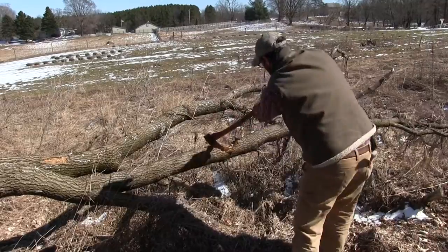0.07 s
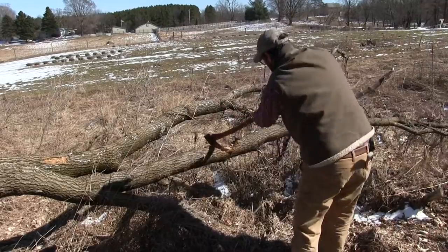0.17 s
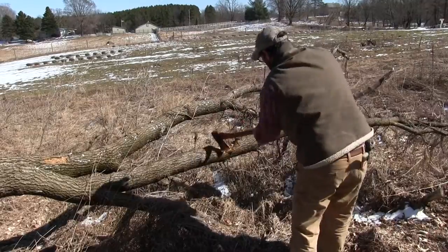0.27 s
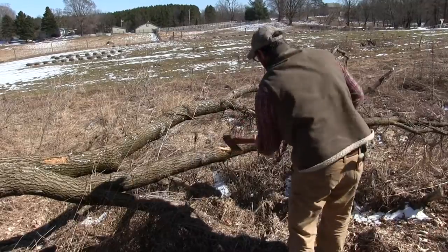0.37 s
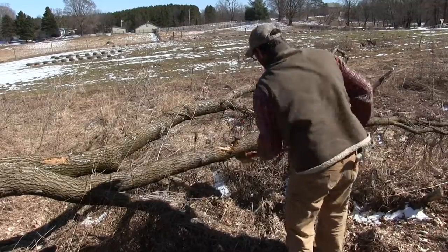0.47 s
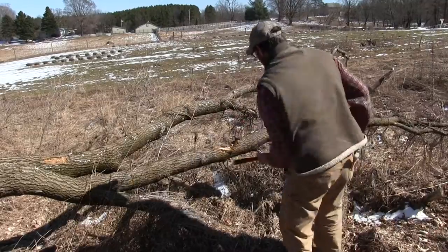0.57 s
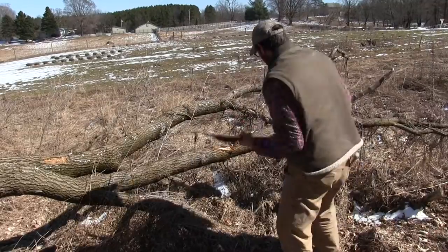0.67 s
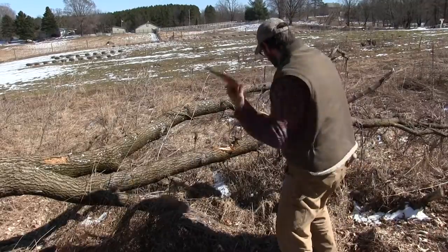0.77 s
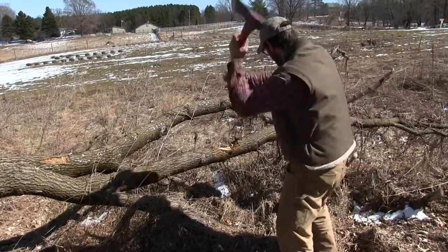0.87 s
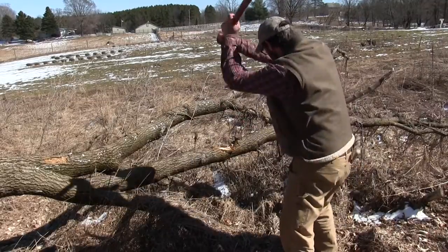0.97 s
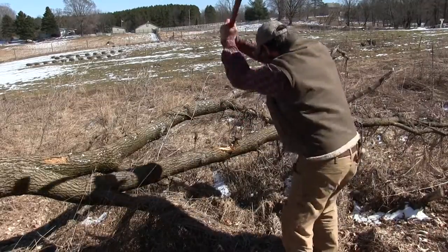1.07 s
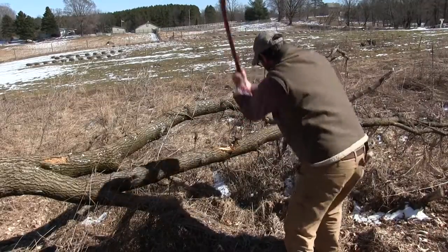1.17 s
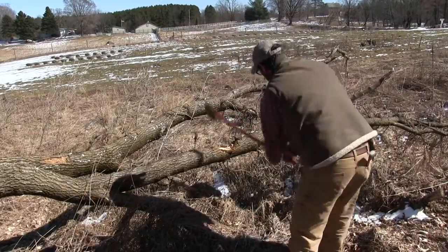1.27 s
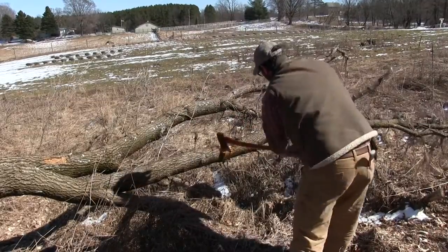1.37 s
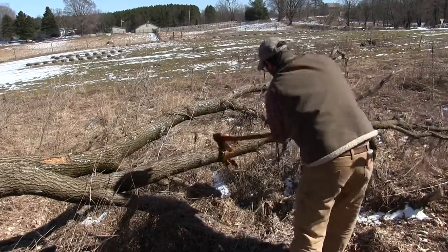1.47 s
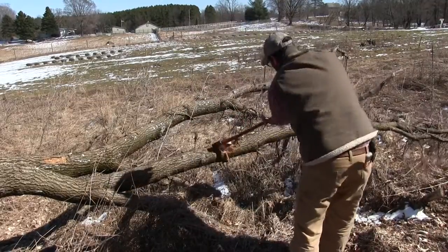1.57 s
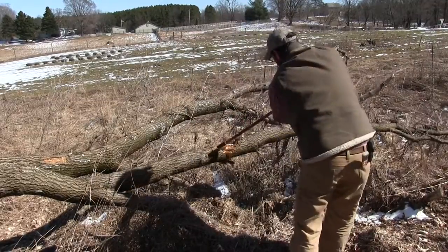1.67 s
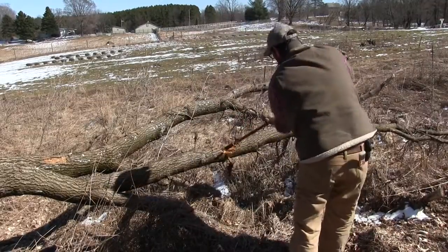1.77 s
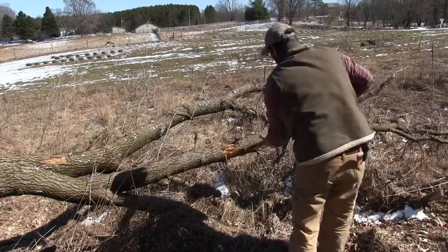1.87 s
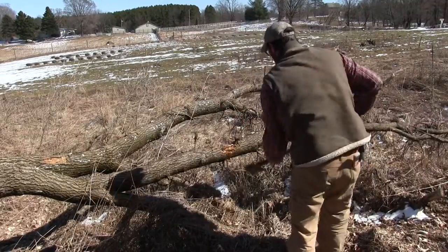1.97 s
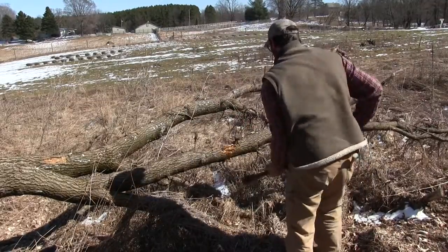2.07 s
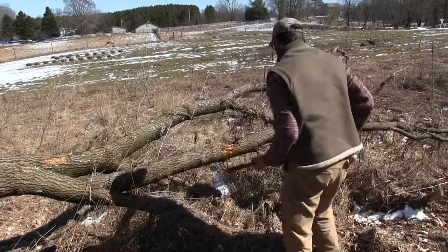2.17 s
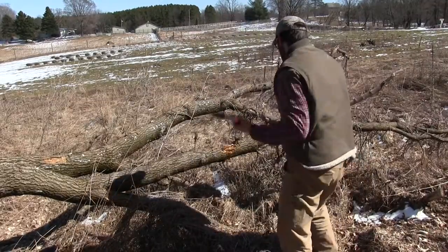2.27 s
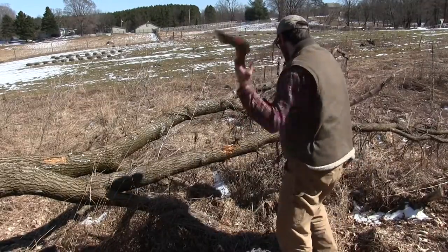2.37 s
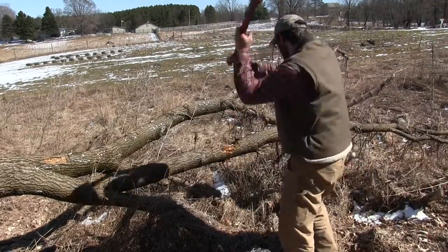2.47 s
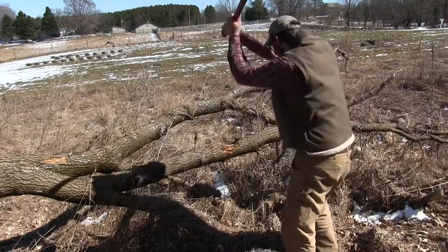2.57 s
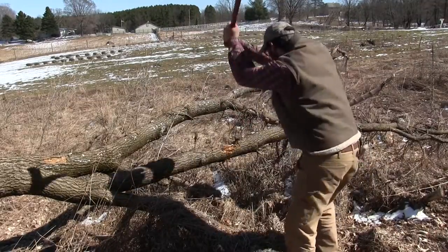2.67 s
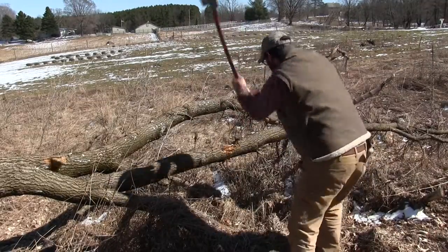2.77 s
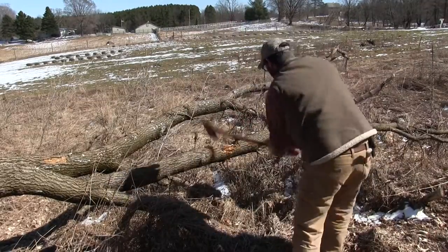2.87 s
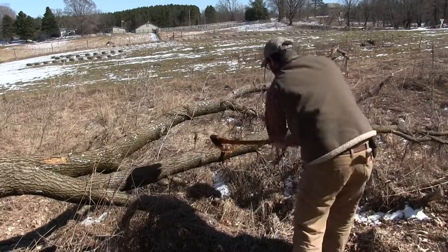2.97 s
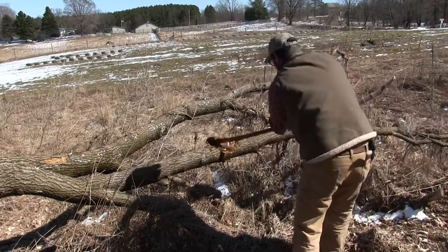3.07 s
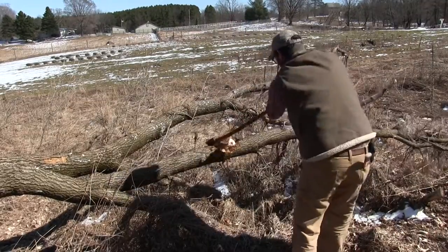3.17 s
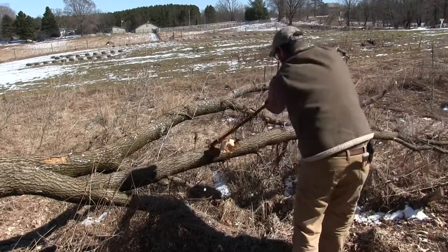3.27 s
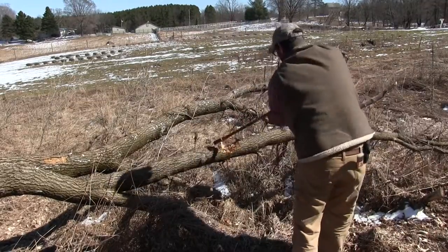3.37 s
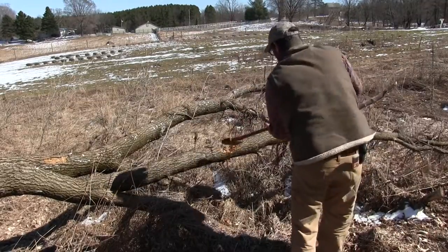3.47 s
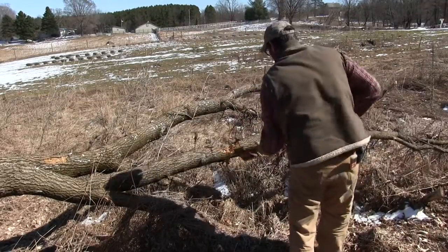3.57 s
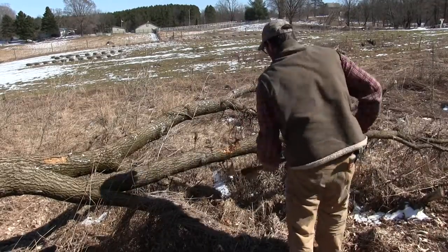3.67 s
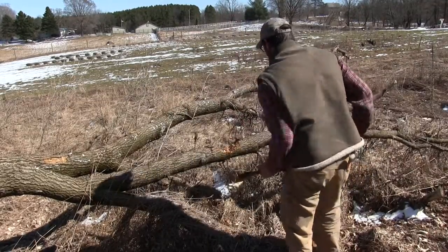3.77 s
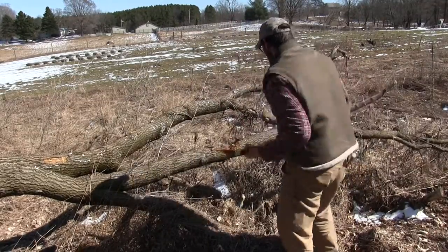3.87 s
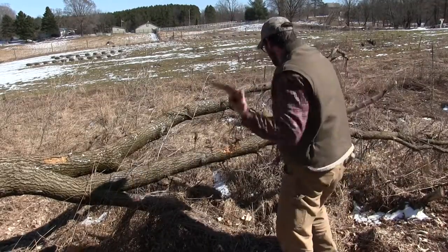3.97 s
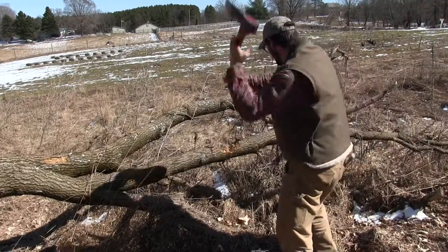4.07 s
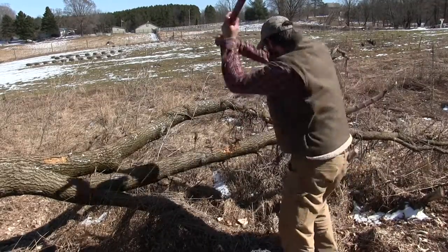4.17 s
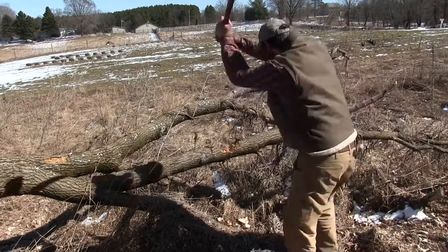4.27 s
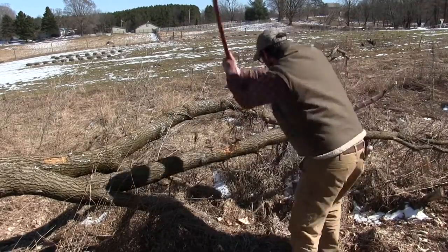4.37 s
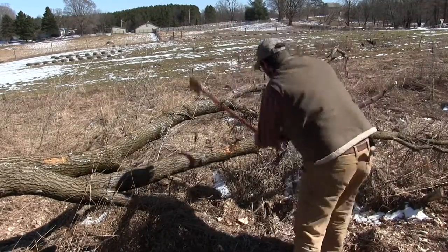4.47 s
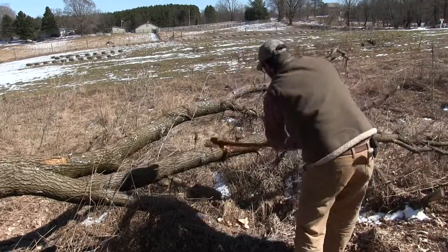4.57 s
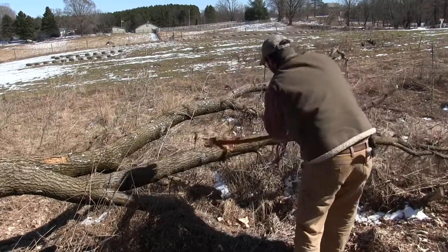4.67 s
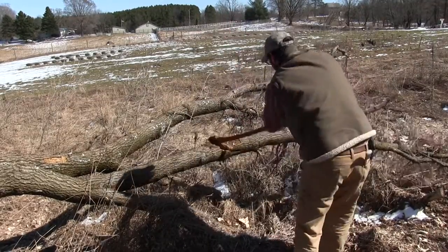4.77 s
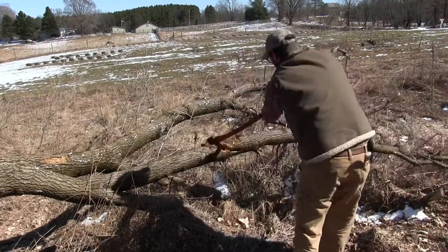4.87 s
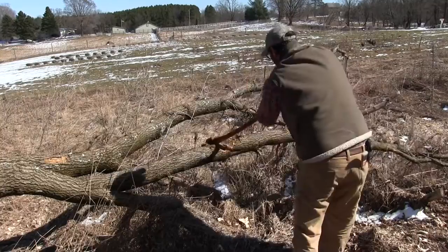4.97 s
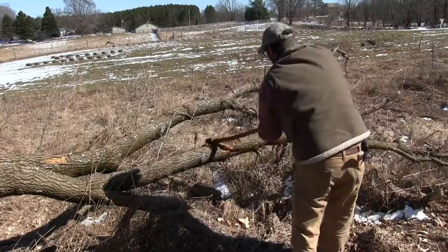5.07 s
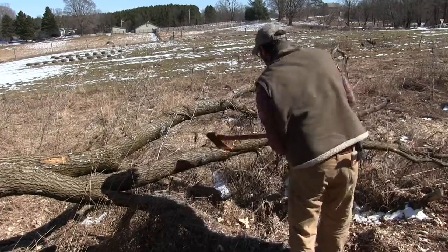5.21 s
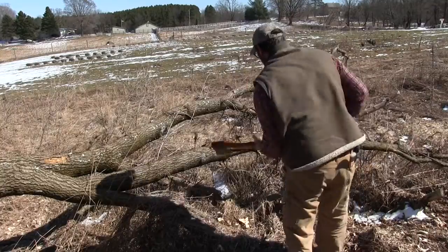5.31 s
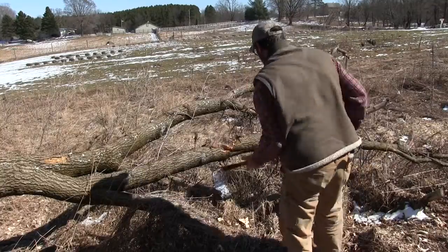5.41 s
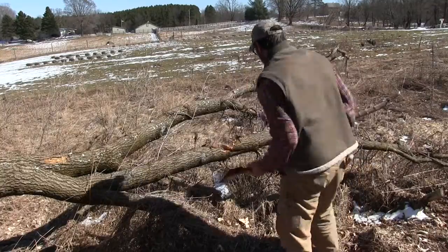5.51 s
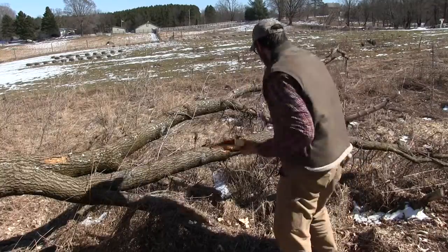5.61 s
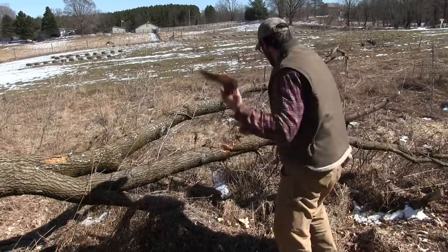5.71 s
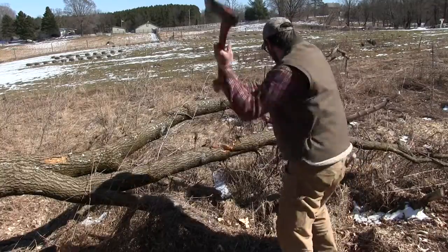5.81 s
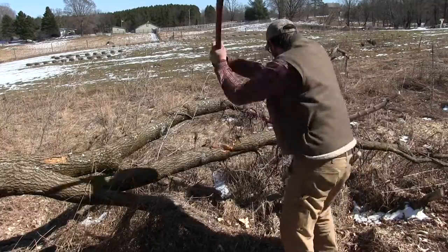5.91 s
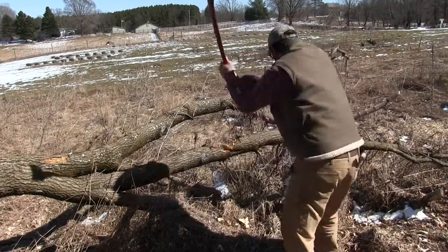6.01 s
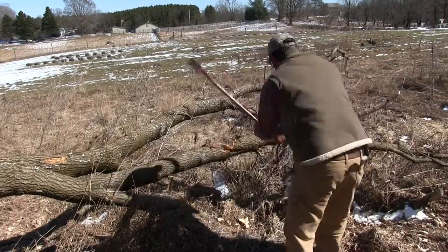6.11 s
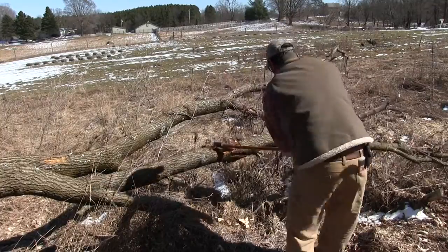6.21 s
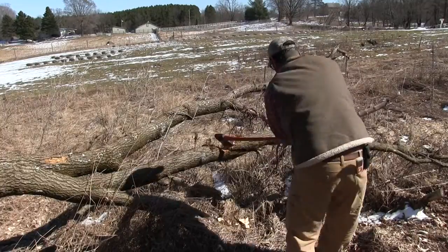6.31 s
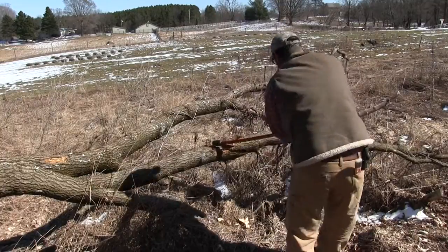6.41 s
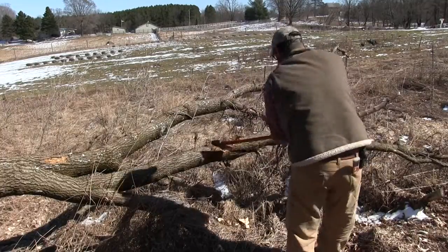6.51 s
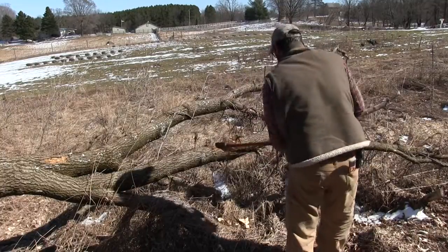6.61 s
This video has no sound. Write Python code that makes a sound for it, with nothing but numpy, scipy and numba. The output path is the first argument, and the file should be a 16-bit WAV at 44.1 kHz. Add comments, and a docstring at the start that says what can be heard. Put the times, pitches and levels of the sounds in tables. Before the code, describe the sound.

Spaced axe blows crack and thud into a fallen limb, chips pattering and dry brush rustling, with wind buffeting in an open field.

```python
"""An axe chops into a fallen limb in an open field: each blow is a ragged burst of force that rings the wood.
Chips are puffs of noise through one resonance; shaken twigs and dry grass are clumps of tiny noise grains.
Wind is lumpy low noise on two microphone ports, with single thumps. A palm squeaks by stick and slip on
the handle, a sleeve swishes as soft treble noise, and a far bird whistles in bent tones with an echo.
A limiter turns loud moments down, and the fastest peaks are clipped softly."""
import sys
import numpy as np
from scipy import signal
from scipy.fft import rfft, irfft, next_fast_len
from scipy.io import wavfile
from scipy.ndimage import map_coordinates
from numba import njit

SR = 44100
rng = np.random.default_rng(int(sys.argv[2]) if len(sys.argv) > 2 else 0)


def int16_out(signal):
    """Quantize to a 16-bit WAV file."""
    q = np.round(np.clip(np.atleast_2d(signal).T, -1, 1) * 32767)
    wavfile.write(sys.argv[1], SR, q.astype(np.int16))


N = 293265
T = np.arange(N) / SR  # time of every sample [s]

# How alike left and right are at each pitch: (frequency [Hz], likeness [0 to 1])
LIKENESS = [(60, 0.62), (180, 0.67), (550, 0.74), (1650, 0.61), (4970, 0.47), (15000, 0.91)]
# A blow, a tug at the stuck blade or a step shakes the brush:
# (time [s], rise [s], hold [s], time for the thrash to fall 60 dB [s], twigs [dB], dry grass [dB])
BRUSH_SHAKES = [(-0.15, 0.047, .01, 1.1, -28.5, -28), (1.419, .12, 0.015, 1.25, -28.5, -29.5),
                (1.963, 0.12, 0.0091, 0.31, -63, -39.5), (2.28, .08, 0.026, 0.88, -54, -45),
                (3, 0.07, 0.17, 0.87, -31.5, -31), (3.867, 0.26, .02, .7, -54, -44.5),
                (4.626, .11, 0.11, .1, -33, -33), (4.85, 0.046, 0.069, 0.35, -34, -31.5),
                (6.286, 0.1, 0.12, 0.54, -38.5, -34.5)]


def amp(db):
    """Turns decibels into a plain gain."""
    return 10 ** (np.asarray(db) / 20)


def unit(x):
    """Scales a sound to an rms (average strength) of 1."""
    return x / np.sqrt(np.mean(x ** 2) + 1e-20)


def along(points, hz):
    """Reads a curve of (Hz, value) points on a logarithmic frequency axis."""
    f, v = np.transpose(points)
    return np.interp(np.log(hz + 1), np.log(f + 1), v)


def wobble(rate):
    """A smooth random curve with `rate` random points a second."""
    points = rng.standard_normal(int(N * rate / SR) + 4)
    return map_coordinates(points, [T * rate])


def filtered(x, response):
    """Filters x by a response given as a function of frequency."""
    m = next_fast_len(N + SR // 2)
    hz = np.fft.rfftfreq(m, 1 / SR)
    return irfft(rfft(x, m) * response(hz), m)[..., :N]


def dull(x, hz):
    """A gentle low-pass filter that takes away the treble."""
    return signal.lfilter(*signal.butter(2, np.clip(hz, 100, 18000), fs=SR), x)


def sides(pan_db):
    """Left and right gains; a positive value makes the left louder."""
    return amp(np.array([pan_db / 2, -pan_db / 2]))


def add(track, s, sound):
    """Mixes a stereo sound into the track at s seconds."""
    part = track[:, round(s * SR):][:, :sound.shape[1]]
    part += sound[:, :part.shape[1]]


def spread(pair, spectrum, alike):
    """Colours two unrelated signals and mixes them to the wanted left-right likeness, rms 1."""
    def response(hz):
        turn = np.arccos(np.clip(along(alike, hz), -1, 1)) / 2
        return amp(along(spectrum, hz)) * np.array([np.cos(turn), np.sin(turn)])
    mid, side = filtered(pair, response)
    return unit(np.array([mid + side, mid - side]))


def crackle(rate, spiky_db, hiss, life):
    """Uneven noise grains with a sharp start and a short decay (life [s]), on a bed of hiss."""
    happens = rng.random((2, N)) < rate / SR
    starts = happens * amp(spiky_db * rng.random((2, N)))
    envelope = signal.lfilter([1], [1, -np.exp(-1 / (life * SR))], starts)
    grains = envelope * rng.standard_normal((2, N))
    return unit(grains) + hiss * rng.standard_normal((2, N))


def shake(peaks_db, linger_db, linger_t60, rest_db):
    """Brush level in dB: each shake swells, thrashes, then rustles on while it dies away."""
    power = amp(2 * rest_db) * np.ones(N)
    for (s, rise, hold, thrash_t60, *_), db in zip(BRUSH_SHAKES, peaks_db):
        after = np.maximum(T - s - rise - hold, 0)
        swell = np.clip((T - s) / rise, 0, 1) ** 0.84
        thrash = amp(-120 * after / thrash_t60)  # -120 because this is power
        rustle = amp(2 * linger_db - 120 * after / linger_t60)
        power += (amp(db) * swell) ** 2 * (thrash + rustle)
    return 10 * np.log10(power)


def shaking():
    """Levels of twigs and grass in dB: both follow the same shakes, but rustle on differently."""
    *_, twigs_db, grass_db = np.transpose(BRUSH_SHAKES)
    twigs = shake(twigs_db, linger_db=-12, linger_t60=4.53, rest_db=-52)
    grass = shake(grass_db, linger_db=-8.5, linger_t60=3.5, rest_db=-53)
    return twigs, grass


def brush():
    """Twigs rattle in coarse grains, dry grass in fine ones with sparse sharp ticks; both come in clumps."""
    # Tone colour of the twigs: (frequency [Hz], level [dB per Hz])
    twig_spectrum = [(80, -48), (150, -12.5), (300, -4.5), (600, -3.5), (1200, -3), (2500, -13.5),
                     (5000, -16), (9000, -34)]
    # Tone colour of the dry grass: (frequency [Hz], level [dB per Hz])
    grass_spectrum = [(800, -12), (2000, -0.5), (3500, -4), (6000, -3.5), (9000, -3), (12000, -5.5),
                      (15000, -5.5), (16500, -26.5)]
    twigs_db, grass_db = shaking()
    clumps = wobble(55)
    coarse = crackle(150, 14.3, hiss=1.0, life=0.0046)
    twigs = amp(twigs_db + 0.16 * clumps) * spread(coarse, twig_spectrum, LIKENESS)
    ticks = crackle(25, 3.1, hiss=0.01, life=0.0014)
    fine = crackle(300, 2.8, hiss=1.53, life=0.0024) + 0.18 * ticks
    grass = amp(grass_db + 1.55 * clumps) * spread(fine, grass_spectrum, LIKENESS)
    return twigs + grass * sides(-3.5)[:, None]


def wind():
    """Turbulence pushes the two ports mostly in opposite directions, in lumps and single thumps."""
    # Strength of the gusts: (time [s], level [dB])
    gusts = [(0.0, -43.5), (1.2, -57.5), (1.43, -63), (1.6, -30.5), (1.9, -47.5), (2.04, -26.5),
             (2.2, -46.5), (2.31, -27), (2.4, -31.5), (2.58, -24), (2.72, -33.5), (2.9, -56.5), (3.3, -34),
             (3.5, -42.5), (4.0, -29.5), (4.11, -52), (4.29, -35.5), (4.43, -47.5), (4.56, -22),
             (4.78, -26.5), (4.9, -46), (5.22, -28.5), (5.48, -34.5), (5.76, -21), (5.87, -33), (5.94, -19),
             (6.15, -17.5), (6.25, -47), (6.45, -31.5), (6.65, -72)]
    # Tone colour of the buffeting: (frequency [Hz], level [dB per Hz])
    rumble = [(12, -58), (20, -45), (43, 5.5), (80, 3.5), (128, 3), (309, -15.5), (369, -17), (700, -34),
              (910, -52), (1540, -120)]
    # Single eddies that thump a port: (time [s], level [dB], pitch [Hz], left over right [dB])
    thumps = [(1.313, -36.5, 273, 16), (1.732, -24, 122, 8), (2.312, -8, 137, 5), (2.571, -9.5, 123, 8),
              (2.632, -11.5, 157, 2.5), (4.546, -18.5, 133, 6), (5.228, -21.5, 250, 12),
              (5.778, -4.5, 190, -3), (5.949, -7, 206, -2.5), (6.095, -10, 117, -1), (6.15, -17, 144, 22)]
    # Steady noise of the far field: (frequency [Hz], level [dB per Hz])
    air_spectrum = [(30, 16), (150, 10.5), (600, 8.5), (2000, -15), (6000, -17), (12000, -18.5),
                    (16000, -9)]
    opposite = [(60, -0.95), (300, -0.25)]  # (frequency [Hz], likeness; negative = opposite pushes)

    gust_s, gust_db = np.transpose(gusts)
    buffet_db = np.interp(T, gust_s, gust_db)
    lumps = amp(2.83 * wobble(45) + 1.93 * np.array([wobble(30), wobble(30)]))
    noise = spread(rng.standard_normal((2, N)), rumble, opposite)
    sway = sides(5.5 * wobble(9))  # the stronger push wanders from port to port
    out = amp(buffet_db) * sway * unit(lumps * noise)

    t = T[:SR // 20] - 0.016
    for s, db, hz, pan_db in thumps:
        push = amp(db) * np.exp(-(t * hz / 0.61) ** 2) * np.sin(2 * np.pi * hz * t)
        add(out, s - 0.008, np.outer(sides(pan_db) * [1, -0.4], push))
    air = spread(rng.standard_normal((2, N)), air_spectrum, LIKENESS)
    return out + amp(-48.5) * air


def ringing(t, limb, thud_db, knock_db, lasting):
    """The struck limb: separate tones that die away, over a dense dull knock of many close ones."""
    ring = np.zeros(len(t))
    for hz, level_db, t60 in limb:
        late = np.maximum(t - 0.8 / hz, 0)  # bending waves: the low modes arrive later
        place_db = thud_db if hz < 550 else knock_db if hz < 1100 else 0
        # loose bark blurs each mode
        jitter = unit(dull(rng.standard_normal(len(t)), hz / 4))
        flutter = 0.83 * np.minimum(late / 0.002, 1) * jitter
        detuned_hz = hz * (1 + 0.029 * rng.normal())
        tone = np.sin(2 * np.pi * detuned_hz * late + flutter) * (1 - np.exp(-late * hz / 5.0))
        ring += amp(level_db + place_db + rng.normal(0, 1.18) - 60 * late / (t60 * lasting)) * tone
    # the many close modes of trunk and branches
    band = signal.butter(3, (238, 1265), "band", fs=SR, output="sos")
    dense = unit(signal.sosfilt(band, rng.standard_normal(len(t))))
    dense_db = 3 + min(thud_db, knock_db) - 60 * t / (0.071 * lasting)
    return ring + amp(dense_db) * dense * np.minimum(t / 0.0022, 1)


def cracking(t, bite, cut, crack_hz):
    """Tearing fibres: a crack that dies in ms, a longer spray of splinters and a bright edge click."""
    after_cut = amp(-60 * (t - cut) / 0.0011) + 0.19 * amp(-60 * t / 0.036)
    burst = (bite + (t >= cut) * after_cut) * rng.standard_normal((3, len(t)))
    burst = burst[:1] + 0.19 * burst[1:]  # mostly shared by both sides
    crack = dull(burst, crack_hz) - dull(burst, 1350)
    crack += burst * (0.03 + 0.22 * amp(-60 * t / 0.015))
    click = bite * amp(-7 - 60 * t / 0.007) * rng.standard_normal(len(t))
    return crack + dull(click, 8000)


def axe():
    """The blade tears fibres for a few ms; that ragged force rings the limb."""
    # Blows on the limb, by the axe or a heavy chunk that drops back:
    # (time [s], strength [dB], thud below 550 Hz [dB], knock from 550 to 1100 Hz [dB], crack [dB],
    #  length of the contact [s], ring length [factor], brightness of the crack [Hz])
    chops = [(0.0316, -7, -37, -11, 8.5, 0.0018, 0.62, 4530), (1.4071, 2, 4, -3, 1.5, 0.0037, 0.56, 2450),
             (2.9985, -5, 4, 9, 15, 0.0025, 0.59, 2970), (4.6297, 1.5, 1.5, -5, -1, 0.0038, 0.58, 3320),
             (4.8221, 0, -9.5, -5, 0.5, .002, 0.68, 2500), (4.894, -17, -2, -6, 12.5, 0.0022, 0.59, 4600),
             (6.2850, -1, -8.5, 2, 1, 0.0055, 0.65, 3420)]
    # Tones of the limb: (frequency [Hz], level [dB], time to fall 60 dB before the ring factor [s])
    limb = [(154.3, -23, 0.29), (201, 11, 0.069), (276.5, -7.5, 0.086), (380.7, -7.5, 0.044),
            (445, 14, 0.04), (483, 13.5, 0.026), (634, -2.5, 0.039), (808, 2, 0.043), (908, -9.5, 0.022),
            (912, -1, 0.018), (1282, 14.5, 0.0097), (1427, 18, 0.01), (1600, 5, 0.013), (1705, -20, 0.039),
            (2180, -52, 0.042), (2940, -4, 0.026), (4080, -60, 0.03)]
    out, t = np.zeros((2, N)), T[:SR // 4]
    for s, db, thud_db, knock_db, crack_db, cut, lasting, crack_hz in chops:
        ring = ringing(t, limb, thud_db, knock_db, lasting)
        bite = (t < cut) * np.minimum(t / 0.001, 1)
        tears = bite * (rng.random(len(t)) < 1200 / SR) * rng.uniform(0.16, 0.4, len(t))
        tears[round(0.0006 * SR)] = 1  # the main hit
        knock = signal.fftconvolve(tears, ring)[:len(t)]
        crack = cracking(t, bite, cut, crack_hz)
        add(out, s, amp(db) * knock + amp(db + crack_db) * crack)
    return out


def patter():
    """Lesser chips rain down at random times, as loud as the twigs shake at that moment plus 5 dB."""
    count = int(40 * N / SR)  # 40 chips a second
    s = rng.uniform(0, N / SR, count)
    pitch, side = rng.standard_normal((2, count))
    twigs_db, _ = shaking()
    db = twigs_db[(s * SR).astype(int)] + 5
    hz = np.clip(2000 * np.exp(0.4 * pitch), 500, 12000)
    return list(zip(s, db, hz, -4 + 5 * side))


def chips():
    """Each small piece of wood gives a puff of noise through one broad resonance."""
    # Chips and twigs that snap or land and stand out:
    # (time [s], level [dB], pitch [Hz], left over right [dB])
    snaps = [(0.069, -22.5, 3870, 3), (0.08, -18, 1750, -3), (0.134, -32, 1820, -29), (0.305, -24, 3150, 4),
             (0.51, -24.5, 3960, -1), (1.435, -15, 1810, 5), (1.444, -9.5, 1840, 2),
             (1.693, -20, 1660, -12.5), (1.97, -24, 1880, -1), (2.057, -25, 5360, -1),
             (2.229, -23, 1750, 16.5), (3.027, -12, 2150, 4.5), (3.067, -20, 1500, -3),
             (3.12, -14, 3040, -8), (3.156, -19, 1570, -10), (3.284, -16.5, 2500, -7),
             (3.297, -20, 6500, -3), (3.484, -30, 2860, -11), (3.902, -30, 10900, 14),
             (3.942, -30.5, 8350, 0), (4.316, -24.5, 1920, 0), (4.412, -35, 4900, -2),
             (4.516, -19, 2040, -5.5), (4.658, -15, 1300, 7), (4.713, -14, 2160, -1.5),
             (4.805, -6.5, 1590, -2.5), (4.906, -13.5, 9000, 1), (4.958, -18, 2090, -9),
             (5.168, -25.5, 2300, 0), (5.22, -24.5, 2500, -3), (5.26, -35, 4000, 0),
             (6.412, -26, 3300, -14)]
    out, t = np.zeros((2, N)), T[:SR // 10]
    for s, db, hz, pan_db in snaps + patter():
        puff = rng.standard_normal(len(t)) * amp(-60 * t / 0.017)  # falls 60 dB in 17 ms
        body = signal.lfilter(*signal.iirpeak(hz, 0.9, fs=SR), puff)
        sound = amp(db) * (1.27 * body + 0.033 * dull(puff, 9000))
        add(out, s, np.outer(sides(pan_db), sound))
    return out


def field(x):
    """Ground, trunk and branches scatter a short diffuse answer."""
    t = T[:SR // 4]
    noise = signal.lfilter([1], [1, -0.6], rng.standard_normal((2, len(t))))
    tail = noise * amp(-60 * t / 0.13) * (t > 0.004)
    return signal.fftconvolve(x, tail / np.linalg.norm(tail[0]), axes=1)[:, :N]


def palm():
    """Skin sticks and slips at an uneven rate and excites the wooden handle."""
    # The palm squeaks on the handle: (time [s], length [s], level [dB], slip rate [Hz])
    squeaks = [(0.671, 0.054, -41.5, 643), (2.578, 0.037, -37, 640), (2.6, 0.038, -30, 622),
               (4.144, 0.093, -41.5, 610), (4.182, 0.02, -35.5, 607)]
    # Resonances of the handle: (frequency [Hz], width [Hz], level [dB])
    handle = [(1314, 240, 7.5), (1810, 140, 10.5), (2320, 420, 4), (3160, 550, 0), (5570, 470, -1)]
    slips = np.zeros(N)
    for s, length, db, slip_hz in squeaks:
        t = T[:round(length * SR)]
        drift = rng.standard_normal(len(t)).cumsum() / np.sqrt(SR / slip_hz)
        turns = np.cumsum(slip_hz / SR * (1 + 0.02 * drift))
        jerks = np.diff(np.floor(turns), prepend=0)  # one jerk for each slip
        force = unit(jerks) + 1.2 * rng.standard_normal(len(t))
        slips[round(s * SR):][:len(t)] += amp(db) * np.sin(np.pi * t / length) * force

    def wood(f):
        total = 0
        for k, (centre, width, db) in enumerate(handle):
            peak = 1j * f * width / (centre * centre - f * f + 1j * f * width)
            total = total + (-1) ** k * amp(db) * peak
        return total
    return filtered(slips, wood)


def sleeve():
    """Cloth on cloth: a soft swell of smooth treble noise."""
    # A sleeve brushes the vest as the axe goes up: (time [s], length [s], level [dB], centre [Hz])
    swishes = [(0.94, 0.16, -41.5, 6230), (2.517, 0.21, -43.5, 4730), (3.994, 0.13, -34.5, 8300),
               (4.166, 0.18, -44.5, 5660), (5.866, 0.21, -41.5, 4930)]
    out = np.zeros((2, N))
    for s, length, db, hz in swishes:
        t = T[:round(length * SR)]
        noise = rng.standard_normal((3, len(t)))
        noise = noise[:1] + 0.12 * noise[1:]  # mostly shared by both sides
        band = signal.lfilter(*signal.iirpeak(hz, 1.1, fs=SR), noise)
        add(out, s, amp(db) * np.sin(np.pi * (t / length) ** 0.53) * unit(band))
    return out


def bird():
    """Each hoarse whistle rises fast to its top and slides down; trees give a late blurred echo."""
    # Whistles of a far bird: (time [s], length [s], start [Hz], top [Hz], end [Hz], level [dB])
    whistles = [(0.962, 0.044, 1330, 1400, 1300, -48), (1.294, 0.091, 1290, 1520, 1310, -44),
                (3.927, 0.062, 1250, 1362, 1240, -43.5), (5.054, 0.13, 1253, 1457, 1120, -44),
                (5.407, 0.11, 1163, 1450, 1105, -42.5), (5.776, 0.1, 1130, 1485, 1160, -40.5),
                (6.135, 0.142, 1163, 1463, 1064, -43.5)]
    song = np.zeros((2, N))
    for s, length, start_hz, top_hz, end_hz, db in whistles:
        u = T[:round(length * SR)] / length  # 0 to 1 through the whistle, top at 0.35
        bend = np.sin(np.pi / 2 * np.interp(u, [0, 0.35, 1], [0, 1, 2]))
        hz = top_hz * bend + np.where(u < 0.35, start_hz, end_hz) * (1 - bend)
        hoarse = 0.34 * unit(dull(rng.standard_normal(len(u)), 80))
        tone = np.sin(2 * np.pi * np.cumsum(hz) / SR + hoarse)
        add(song, s, np.outer(sides(-2.9), amp(db) * np.sin(np.pi * u) ** 0.082 * tone))
    t = T[:SR // 2]
    # the echo starts after 10 ms and thickens after 100 ms
    trees = rng.standard_normal((2, len(t))) * amp(-60 * t / 0.5) * (0.9 * (t > 0.01) + (t > 0.1))
    echo = signal.fftconvolve(song, trees / np.linalg.norm(trees[0]), axes=1)[:, :N]
    return song * amp(1.7 * wobble(140)) + amp(-3.0) * echo  # the direct song flickers in level


def scene():
    """Adds all the sources; only the wood sounds get the answer of the field."""
    wood = axe() + chips()
    return wood + amp(-14.0) * field(wood) + brush() + palm() + sleeve() + bird() + wind()


@njit
def follow(level, rise, fall):
    """Follows a level smoothly, with one speed for rising and another for falling."""
    out, e = np.empty_like(level), 0.0
    for i in range(len(level)):
        e += (rise if level[i] > e else fall) * (level[i] - e)
        out[i] = e
    return out


def record(dry):
    """Cuts deep bass, turns loud moments down within ms, softly clips fast peaks and rolls off the top."""
    dry = signal.lfilter(*signal.butter(2, 45, "high", fs=SR), dry)
    envelope = follow(np.abs(dry).max(0), 1 / (0.0086 * SR), 1 / (0.0043 * SR))
    memory = follow(envelope, 1 / (0.0035 * SR), 1 / (0.033 * SR))  # lets go more slowly
    limited = dry / (1 + (envelope / amp(-9.5)) ** 2) ** 0.5
    limited = limited / (1 + memory / amp(-2.5))
    clipped = limited / (1 + np.abs(limited / 0.98) ** 6) ** (1 / 6)
    x = signal.lfilter(*signal.butter(1, 60, "high", fs=SR), clipped)
    # treble fades around 13 kHz and stops at 15.8 kHz
    return filtered(x, lambda hz: (hz < 15800) / np.sqrt(1 + (hz / 13000) ** 6))


dry = scene()
out = record(dry)
int16_out(out)
```